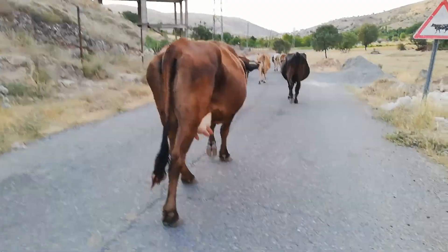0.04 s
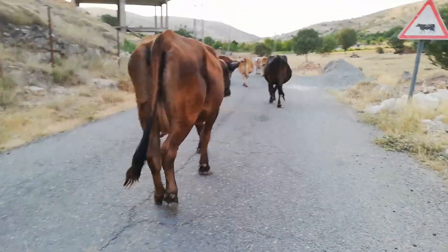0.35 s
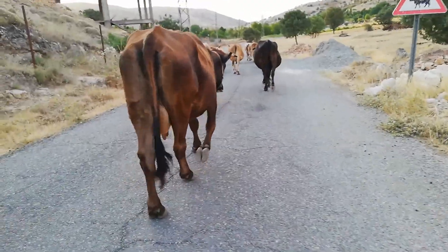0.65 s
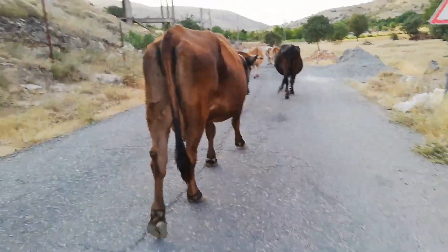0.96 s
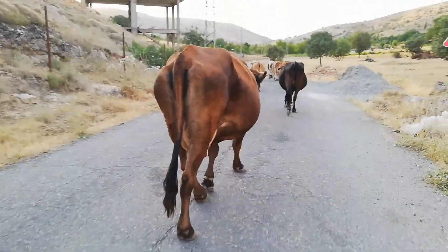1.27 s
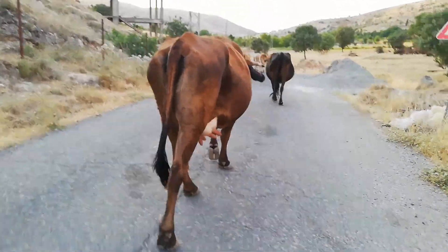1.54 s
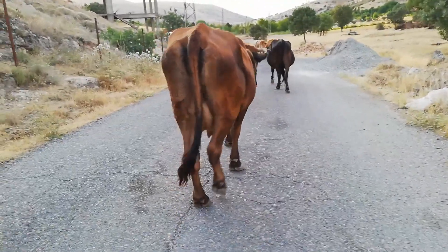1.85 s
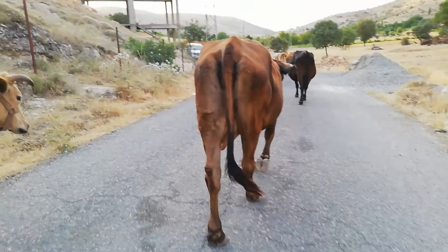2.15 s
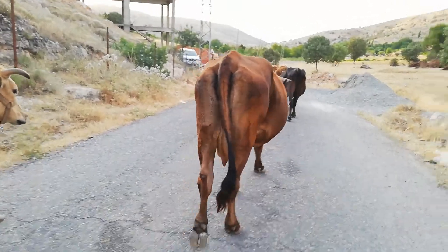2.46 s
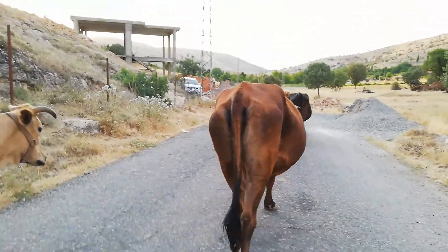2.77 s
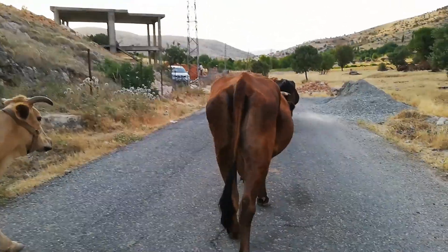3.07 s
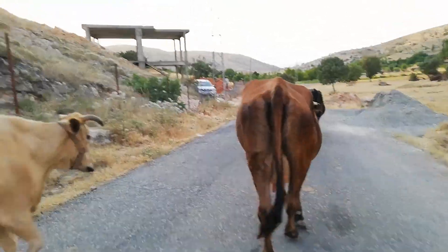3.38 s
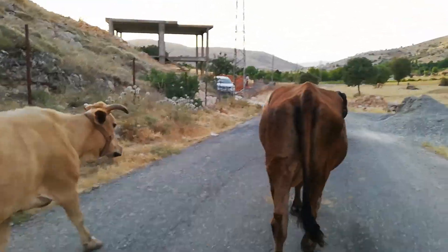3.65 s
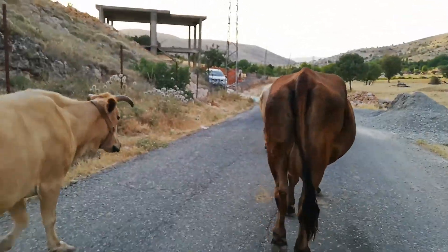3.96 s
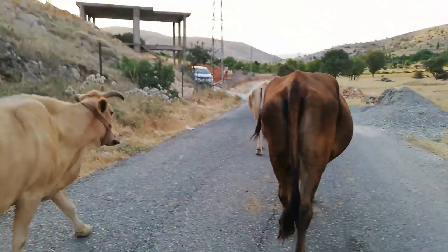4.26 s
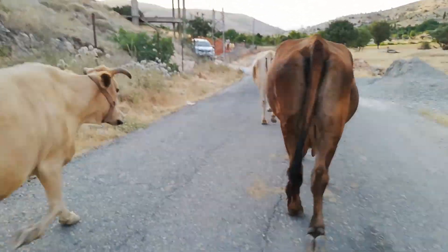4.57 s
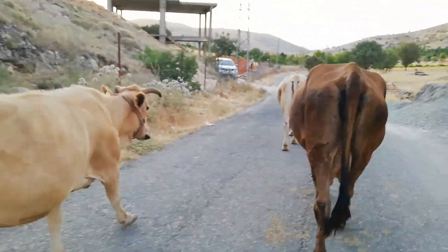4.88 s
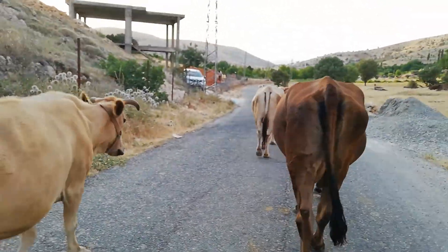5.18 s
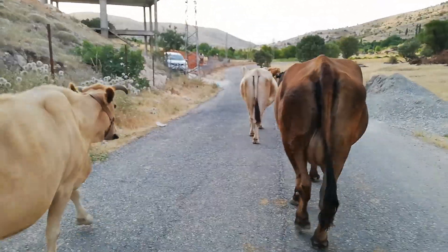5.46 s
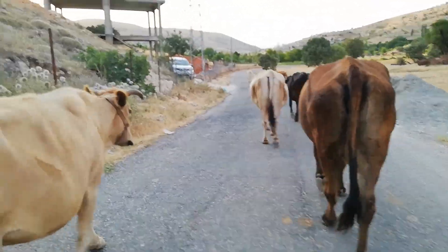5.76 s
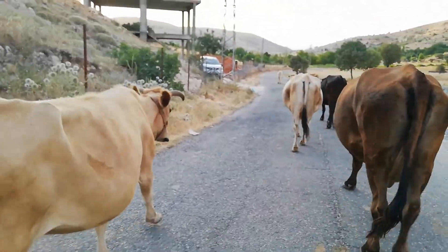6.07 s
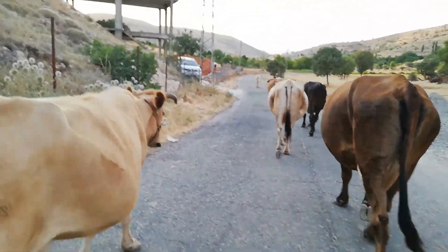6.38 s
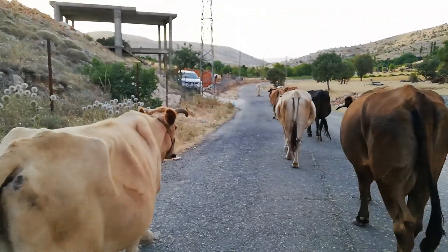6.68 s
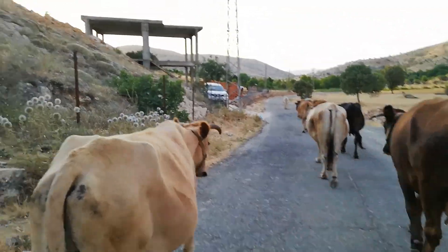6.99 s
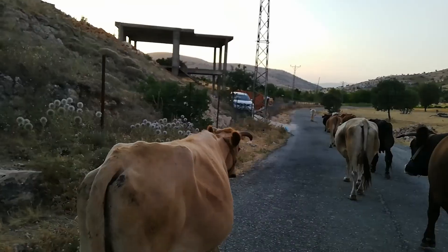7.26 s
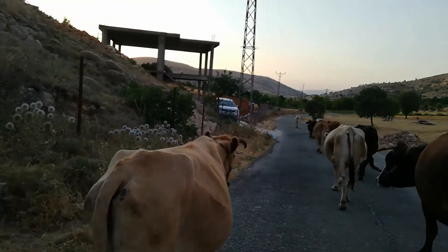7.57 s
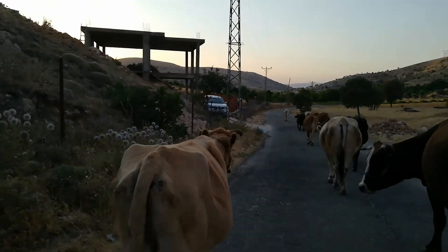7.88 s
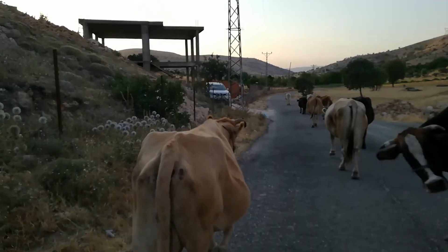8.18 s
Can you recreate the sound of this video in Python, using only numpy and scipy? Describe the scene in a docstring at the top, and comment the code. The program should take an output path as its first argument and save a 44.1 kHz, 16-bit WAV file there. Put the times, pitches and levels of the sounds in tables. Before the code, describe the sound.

Cattle and a herder walk along a gritty asphalt road in quiet open country, heard from a handheld microphone just behind the animals. From the start, shoes crunch on sand and gravel about every 0.6 seconds, among irregular hoof knocks, short scuffs and the sharp snaps of loose stones. A light breeze rumbles on the microphone in soft, uneven gusts. At about 1.4 seconds one hoof lands with a hollow clop inside a quick cluster of knocks. A heavy tread thumps dully near 2.9 seconds. Firmer knocks come around 4, 4.5 and 5.2 seconds, the middle one with a low thud. A stone snaps at 6.1 seconds, the hardest knock follows at 6.4, and another sharp snap comes near 7.3. Faint hooves further up the road and the close crunching steps carry on until the end, just after 8 seconds.

```python
"""A gritty country road, heard from a phone carried by a herder close behind ambling cattle.
From the start a light breeze rumbles on the two microphone ports, which colour the sound very differently.
Hooves and shoes knock on the asphalt, loose stones snap, and grit crunches at each step, 0.6 s apart.
One hoof lands hollow at 1.4 s, a heavy tread thumps near 2.9 s, and the hardest knock comes at 6.4 s.
Faint hooves carry on further up the road to the end."""
import sys
import numpy as np
from scipy import signal
from scipy.fft import rfft, irfft, next_fast_len
from scipy.io import wavfile

SR = 44100
rng = np.random.default_rng(int(sys.argv[2]) if len(sys.argv) > 2 else 0)


def generate_wav(sig):
    """Save sig (samples, or channels by samples) to the path in sys.argv[1] as 16-bit PCM at SR."""
    pcm = np.round(np.clip(np.atleast_2d(sig).T, -1, 1) * 32767).astype(np.int16)
    wavfile.write(sys.argv[1], SR, pcm)


N = 362943
T = np.arange(N) / SR
TAPS = 2048
HZ = np.fft.rfftfreq(TAPS, 1 / SR)
PORT_LAG_S = .00035  # sound from straight below reaches the right port later

# hooves and heels on the asphalt: start_s, knock_db, clack_db, clack_hz, crush_s, pan_db (left over right)
FOOT_KNOCKS = [(.052, -49.5, -50, 1950, 0.0031, 4.5), (0.7728, -53, -49, 1740, .0016, -3),
               (0.9679, -54, -50, 2620, 0.001, -6.5), (1.331, -42, -45.5, 1560, 0.0031, 6),
               (1.3942, -42, -46, 1890, 0.0052, 1), (1.476, -36.5, -39.5, 2510, 0.0036, 4),
               (1.5134, -37.5, -63, 1540, 0.00083, 3.5), (1.8133, -55, -53.5, 1450, 0.0032, -2),
               (2.0893, -40, -34.5, 2570, .0032, 5.5), (2.2161, -47.5, -45, 1520, .0035, -1),
               (2.5084, -46.5, -65, 1640, 0.0026, 1.5), (2.8778, -51, -55, 1540, 0.0053, -3),
               (2.9412, -46, -47.5, 1740, 0.0043, 1.5), (3.2466, -49, -42, 1550, .004, -2),
               (3.5835, -43.5, -46.5, 1740, .0003, -9.5), (3.6537, -58, -38.5, 1530, 0.0036, 5.5),
               (3.9539, -32.5, -36.5, 3130, .0025, 4), (4.3922, -43, -45, 1640, 0.003, 4.5),
               (4.475, -33, -31, 1730, 0.000087, -12), (4.598, -41.5, -50, 1640, .0014, 3.5),
               (5.07, -42.5, -50, 1670, 0.0058, 4.5), (5.1054, -43, -45, 1590, 0.0063, 5.5),
               (5.2131, -37, -39, 3340, 0.004, 2.5), (5.2225, -34, -36.5, 3250, 0.0019, 1.5),
               (5.6021, -51, -52.5, 2440, 0.0047, 1), (5.8187, -47, -49, 2380, .001, 0),
               (5.8696, -55, -45.5, 1800, 0.0052, -1), (6.3988, -34.5, -33.5, 1750, 0.0027, 0),
               (6.4023, -27, -30.5, 2670, .0014, 4), (6.466, -48, -44.5, 2030, .002, -0.5),
               (6.957, -47.5, -66, 2500, .001, 0.5), (7.0282, -41, -51, 1690, 0.0029, -2.5),
               (7.5306, -41, -47, 3300, 0.0043, 2.5), (7.5962, -40, -49, 1800, 0.0033, 2),
               (7.891, -52, -51, 1710, .0067, 0.5), (8.0368, -49, -48, 3000, 0.00044, 8),
               (8.1556, -39, -51, 1850, 0.0028, 5.5)]
# loose stones snapping underfoot: start_s, clack_db, tick_db, clack_hz, crush_s, pan_db
STONE_SNAPS = [(.221, -44.5, -69, 2380, .001, 7.5), (0.2667, -52, -41, 3000, .001, 2.5),
               (0.3054, -58, -45, 3000, .0003, 2.5), (0.6347, -57, -47.5, 1940, .002, 5.5),
               (.825, -48.5, -47, 2620, .003, 4), (1.1564, -42, -69, 2380, 0.00054, 6.5),
               (1.2308, -42, -67, 2290, 0.00055, 4.5), (1.3895, -44, -56, 3640, 0.0027, 0.5),
               (1.869, -42.5, -75, 1980, 0.0016, 3.5), (2.1432, -47.5, -36.5, 1810, 0.0011, 2),
               (2.297, -50.5, -64, 1820, .0016, 7), (2.4103, -40.5, -55, 2420, 0.00072, 8.5),
               (2.4846, -44, -70, 1900, .0013, 3.5), (2.7894, -55, -44, 3230, .002, 2.5),
               (3.338, -46, -39.5, 2780, .0008, -3), (3.371, -57, -45, 2800, .001, 0.5),
               (3.649, -37, -52, 2880, 0.00096, 8.5), (3.725, -38.5, -54, 1730, 0.0067, -2.5),
               (3.9866, -40.5, -67, 3120, .0013, 5), (4.112, -55, -47, 3000, .001, 1),
               (4.166, -39, -66, 4640, 0.0035, 7.5), (4.301, -59, -51, 3500, .0003, 9),
               (4.3441, -41, -65, 2580, 0.002, 0), (4.8556, -48.5, -46, 3940, .0014, 1),
               (4.9359, -47, -46, 4700, .003, 4), (4.973, -41, -47, 2050, 0.0011, 3.5),
               (5.33, -51, -48, 2900, .003, 1.5), (5.5073, -50, -75, 2200, 0.00068, 8.5),
               (6.0861, -49, -68, 2970, 0.0011, 8.5), (6.1076, -30, -38.5, 2830, 0.0017, 7),
               (6.1864, -43, -53.5, 2070, .002, 3.5), (6.3272, -48.5, -47, 3340, 0.0011, -1),
               (6.4294, -31.5, -39, 2330, 0.0015, 3), (6.681, -38, -72, 2550, 0.00061, 5.5),
               (6.7775, -46, -81, 2130, 0.0026, 3.5), (6.877, -51, -68, 3500, .003, -1.5),
               (7.022, -49, -42, 3000, .003, 5), (7.2537, -31.5, -31, 3370, 0.00018, 1.5),
               (7.332, -43.5, -68, 1850, 0.004, -5), (7.64, -60, -44.5, 3000, 0.0024, 0)]


def amp(db):
    """Decibels to gain."""
    return 10 ** (np.asarray(db) / 20)


def unit_rms(x):
    """Scales to an rms of 1."""
    return x / np.sqrt(np.mean(x ** 2) + 1e-20)


def gain_at(spectrum, hz):
    """The gain of a spectrum, with straight lines on a log-frequency axis."""
    corner_hz, db = np.transpose(spectrum)
    return amp(np.interp(np.log(hz + 1), np.log(corner_hz + 1), db))


def add(mix, start_s, sound):
    """Mixes a sound in at start_s."""
    part = mix[..., max(round(start_s * SR), 0):][..., :sound.shape[-1]]
    part += sound[..., :part.shape[-1]]


def causal_ring(gain):
    """The shortest causal ring that has this gain over HZ."""
    log_gain = np.log(np.maximum(gain, gain.max() * 1e-5))
    mirrored = np.r_[log_gain, log_gain[-2:0:-1]]
    return np.fft.ifft(np.exp(np.conj(signal.hilbert(mirrored)))).real


def colour(x, spectrum):
    """Passes a sound through a causal filter."""
    return signal.oaconvolve(x, causal_ring(gain_at(spectrum, HZ)))[:len(x)]


def noise(spectrum):
    """Random noise of a given spectrum."""
    size = next_fast_len(N)
    gain = gain_at(spectrum, np.fft.rfftfreq(size, 1 / SR))
    return unit_rms(irfft(rfft(rng.standard_normal(size)) * gain, size)[:N])


def wander(per_s):
    """A random curve of rms 1 with per_s knots a second."""
    knots = np.arange(0, T[-1] + 1, 1 / per_s)
    return unit_rms(np.interp(T, knots, rng.standard_normal(len(knots))))


def swell(centre_s, half_s):
    """A smooth rise and fall, as power."""
    return np.exp(-((T - centre_s) / half_s) ** 2)


def hump(hz, octaves):
    """A broad resonance over HZ, as power with a mean of 1."""
    power = 1 / (1 + (np.log2((HZ + 1) / hz) / octaves) ** 2) ** 3
    return power / power.mean()


def mode(db, hz, t60_s):
    """One dying sine."""
    t = np.arange(SR // 5) / SR
    return amp(db - 60 * t / t60_s) * np.sin(2 * np.pi * hz * t)


def cracks(per_s, spread_db):
    """A random train of clicks: many small, a few large."""
    size = amp(spread_db * np.minimum(rng.exponential(1, N), 4))
    return size * rng.choice([-1., 1.], N) * (rng.random(N) < per_s / SR)


def ports(x, lag_s, pan_db=0):
    """Shares a sound between the ports; positive lag delays the right, positive pan favours the left."""
    lag = round(lag_s * SR)
    pair = np.array([np.r_[np.zeros(max(late, 0)), x][:len(x)] for late in (-lag, lag)])
    return pair * unit_rms(amp([[pan_db], [0]]))


def roadside(x, wet_db, near_db=-11, near_t60_s=0.023, far_db=-19, far_t60_s=0.13):
    """The road and nearby bodies scatter a sound at once; the bank adds a thin, dull tail."""
    t = np.arange(SR // 4) / SR
    near, far = rng.standard_normal((2, 2, len(t))) * (rng.random((2, 2, len(t))) < 2500 / SR)
    near = near * amp(-60 * t / near_t60_s) * (t > .0006)
    far = far * amp(-60 * t / far_t60_s) * (t > .008)
    far = signal.lfilter(*signal.butter(2, 4000, fs=SR), far)
    echo = sum(amp(db) * taps / np.linalg.norm(taps, axis=1, keepdims=True)
               for db, taps in ((near_db, near), (far_db, far)))
    out = amp(wet_db) * signal.fftconvolve(x, echo, axes=1)
    add(out, 0, x)
    return out


def strike(thud_db, knock_db, clack_db, tick_db, clack_hz, crush_s, pan_db, ring_share=1.0, tick_hz=6600):
    """One contact and a quick run of smaller fractures sound the foot, the road and the stone."""
    t = np.arange(TAPS) / SR
    crush_s = max(crush_s, 1e-4)
    fractures = rng.standard_normal(TAPS) * (rng.random(TAPS) < 5000 / SR)
    force = 0.53 * fractures * np.exp(-t / crush_s)
    force[0] = -1  # the first contact
    # a sudden snap is broad; a longer crush sets hoof horn or stone ringing at its pitch
    ringing = ring_share * crush_s / (crush_s + 0.002)
    clack = ringing * hump(clack_hz, .27) + (1 - ringing) * hump(clack_hz, 1.05)
    power = (amp(thud_db) ** 2 * hump(364, 0.85) + amp(knock_db) ** 2 * hump(1010, 0.61)
             + amp(clack_db) ** 2 * clack + amp(tick_db) ** 2 * hump(tick_hz, 0.94))
    blow = signal.fftconvolve(force, causal_ring(np.sqrt(power)))
    energy = power.mean() * .01 * SR  # that power held for 10 ms
    blow *= np.sqrt(energy / np.sum(blow ** 2))
    lag_s = .0003 + .00005 * pan_db  # the further left, the later at the right port
    level_db = 10 * np.log10(power.mean())
    # loud strikes are close and dry, faint ones far and scattered
    return roadside(ports(blow, lag_s, pan_db), wet_db=-.55 * (level_db + 44))


def valley_air(level_db=-63):
    """The steady quiet of the open valley, partly shared by the ports."""
    # spectrum of the open air: frequency_hz, density_db
    air_spectrum = [(30, 11.5), (300, 3.5), (650, -11), (1200, -5.5), (3000, -14.5), (6000, -7),
                    (16000, -21.5)]
    shared = noise(air_spectrum)
    apart = np.array([noise(air_spectrum), noise(air_spectrum)])
    return amp(level_db) * unit_rms(shared + 0.71 * apart)


def breeze(calm_db=-61.5, lumpy_db=3.0, apart_db=-14):
    """Lumpy low buffeting right on the microphone, mostly shared by the ports."""
    # spectrum of the buffeting: frequency_hz, density_db
    wind_spectrum = [(2, -16), (14, 1.5), (35, -0.5), (70, -2.5), (130, -7.5), (300, -15), (600, -38),
                     (2000, -42)]
    # gusts on the microphone: centre_s, half_length_s, level_db
    gusts = [(0.252, 0.13, -52), (0.846, 0.1, -55), (1.527, 0.048, -55), (2.603, 0.097, -59.5),
             (2.915, 0.2, -54), (3.66, 0.11, -52.5), (4.14, 0.076, -49.5), (4.454, 0.06, -54),
             (5.856, 0.088, -56), (6.255, 0.03, -51.5), (6.486, 0.033, -52.5), (7.137, 0.22, -54),
             (7.534, 0.033, -51.5), (7.716, 0.043, -52), (8.1, .03, -49.5)]
    shared = noise(wind_spectrum)
    apart = np.array([noise(wind_spectrum), noise(wind_spectrum)])
    buffet = unit_rms((shared + amp(apart_db) * apart) * amp(lumpy_db * wander(per_s=25)))
    gust_power = sum(amp(db) ** 2 * swell(centre_s, half_s) for centre_s, half_s, db in gusts)
    return np.sqrt(amp(calm_db) ** 2 + gust_power) * buffet


def far_herd(clack_db=-58, knock_db=-61, spread_db=3, count=50):
    """Faint hooves of the cattle further up the road."""
    out = np.zeros((2, N))
    for k, (when, size, pitch, side) in enumerate(rng.uniform(-1.2, 1, (count, 4))):
        knock, clack = knock_db + spread_db * size, clack_db + spread_db * size
        hoof = strike(knock - 6.5, knock, clack, clack - 19.5,
                      clack_hz=2000 * 1.5 ** pitch, crush_s=0.0017, pan_db=5 * side)
        add(out, (k + .5 + when / 2) * T[-1] / count, hoof)
    return out


def tread(start_s, length_s, press_s=0.054, load_db=3, lift_db_per_s=260):
    """A foot presses on the grit, grows louder as it takes the weight, and lifts; as power."""
    t = T - start_s
    press = np.clip(t / press_s + 1, 0, 1)
    weight_db = load_db * (np.clip(t / length_s, 0, 1) - .5)
    lift_db = lift_db_per_s * np.maximum(t - length_s, 0)
    return (press * amp(weight_db - lift_db)) ** 2


def grinding(shuffle_sand_db=-66.5, shuffle_gravel_db=-62, scatter_db=-15.5, scatter_db_per_s=220):
    """How hard steps, scuffs and blows work the sand and the gravel: a gain curve for each."""
    # the herder's soles crunch down, then the toe pushes off:
    # start_s, length_s, sand_db, gravel_db, push_after_s, push_db (against the crunch)
    steps = [(0.247, 0.1, -48, -50, 0.33, -5.5), (0.72, 0.12, -47, -51.5, 0.23, 0.5),
             (1.474, 0.13, -52.5, -54, 0.25, -5.5), (2.038, 0.11, -51, -48.5, 0.22, -12),
             (2.758, 0.033, -57, -49, 0.14, -7), (3.279, 0.092, -49, -50, 0.181, 0),
             (3.964, 0.13, -47.5, -48.5, 0.22, -10.5), (4.553, 0.18, -50.5, -53, 0.32, -4.5),
             (5.228, 0.1, -47, -48, 0.17, -6.5), (5.756, 0.102, -49, -47, 0.21, -11),
             (6.407, 0.16, -52, -51.5, 0.165, -4.5), (6.938, 0.12, -50, -49.2, 0.27, -3),
             (7.628, 0.023, -48.5, -48.5, 0.28, -5), (8.202, 0.1, -47.6, -50, 0.2, -6.0)]
    # hooves dragging over the grit: start_s, length_s, sand_db, gravel_db
    scuffs = [(0, 0.1, -49.5, -53), (0.364, 0.021, -49.5, -61), (1.065, 0.092, -52.5, -55.5),
              (1.91, 0.077, -56.5, -58.5), (3.12, .02, -76, -57), (3.572, 0.064, -66, -56.5),
              (4.352, .025, -62, -48.5), (4.445, 0.021, -55.5, -48.5), (6.078, 0.015, -55, -57)]
    # the rest of the herd never stops shuffling, in fits and starts
    power = amp([[shuffle_sand_db], [shuffle_gravel_db]]) ** 2 * amp(2 * wander(per_s=16)) ** 2
    for start_s, length_s, sand_db, gravel_db, push_after_s, push_db in steps:
        push_off = amp(push_db) ** 2 * swell(start_s + push_after_s, half_s=0.059)
        power += amp([[sand_db], [gravel_db]]) ** 2 * (tread(start_s, length_s) + push_off)
    for start_s, length_s, sand_db, gravel_db in scuffs:
        power += amp([[sand_db], [gravel_db]]) ** 2 * tread(start_s, length_s)
    # gravel chips scatter after each blow, in proportion to its clack
    scatter = amp(scatter_db - scatter_db_per_s * T[:SR // 2]) ** 2
    blows = [(row[0], row[2]) for row in FOOT_KNOCKS] + [row[:2] for row in STONE_SNAPS]
    for start_s, clack_db in blows:
        add(power[1], start_s, amp(clack_db) ** 2 * scatter)
    return np.sqrt(power)


def sand(pressure, clump_db=4.0, ping_db=-6, ping_t60_s=0.0042):
    """Fine grains burst in clumps as soles roll over them; single hard ones ping at their own pitch."""
    # spectrum of bursting grains: frequency_hz, density_db
    grain_spectrum = [(300, -67), (1500, -3), (4000, -5.5), (7000, -3), (10000, 0.5), (16000, -1)]
    clumps = amp(clump_db * wander(per_s=180))
    crackle, pings = np.zeros((2, N)), np.zeros((2, N))
    for lag_s in np.linspace(-PORT_LAG_S, 2 * PORT_LAG_S, 3):
        crackle += ports(colour(cracks(per_s=1500, spread_db=4.0) * clumps, grain_spectrum), lag_s)
    for hz in np.geomspace(3600, 13000, 12):
        ping = signal.oaconvolve(cracks(per_s=7, spread_db=6), mode(0, hz, ping_t60_s))[:N]
        pings += ports(ping, PORT_LAG_S * rng.uniform(-1, 4.05))
    # pings go on between the strides, so they follow the pressure only partly
    ping_gain = amp(ping_db) * np.sqrt(pressure * pressure.mean())
    return pressure * unit_rms(crackle) + ping_gain * unit_rms(pings)


def gravel(pressure, gain_db=-1.0, clump_db=4.0, patch_db=3.0, ring_cycles=1.84):
    """Chips of many sizes grind together; each rings for a few cycles from its own place on the road."""
    # colour of the scraping chips: frequency_hz, gain_db
    scrape_spectrum = [(100, -7.5), (300, -2.5), (650, -1), (1200, 3), (2000, -0.5), (3200, -1), (5000, -6),
                       (9000, -5.5), (16000, -39)]
    out, t = np.zeros((2, N)), np.arange(TAPS // 2) / SR
    clumps = amp(clump_db * wander(per_s=90))
    for hz in np.geomspace(300, 5500, 20):
        ring = np.exp(-t * hz / ring_cycles) * np.sin(2 * np.pi * hz * t)
        caught = amp(patch_db * wander(per_s=35))  # which size of chip is under the sole keeps changing
        chips = signal.oaconvolve(cracks(per_s=300, spread_db=4) * clumps * caught, ring)[:N]
        lag_s = PORT_LAG_S * rng.uniform(0.44, 2.2)
        out += ports(unit_rms(chips) * np.sqrt(hz), lag_s, pan_db=rng.normal(-0.65, 2.4))
    scrape = np.array([colour(side, scrape_spectrum) for side in out])
    return amp(gain_db) * pressure * unit_rms(scrape)


def heavy_treads(gain_db=-2):
    """Weight lands on the road with a dull thump."""
    # low thumps: start_s, level_db, pitch_hz, t60_s
    thumps = [(1.514, -42.5, 213, 0.077), (2.879, -30.5, 188, 0.042), (2.905, -39, 60, 0.09),
              (2.945, -36, 93, 0.065), (3.64, -40, 85, 0.11), (4.078, -44.5, 283, 0.097),
              (4.144, -44, 277, 0.14), (4.472, -31, 110, .05), (7.525, -37.5, 176, 0.06),
              (8.081, -42, 129, 0.061)]
    out = np.zeros((2, N))
    for start_s, *ring in thumps:
        add(out, start_s, ports(mode(*ring), PORT_LAG_S, pan_db=-2.2))
    return amp(gain_db) * out


def hollow_clop(start_s=1.397, gain_db=2):
    """One hoof lands hollow and rings briefly."""
    # modes of the hoof: level_db, pitch_hz, t60_s
    hoof_modes = [(-42, 385, .075), (-51, 1170, .025), (-50, 1330, .025)]
    out = np.zeros((2, N))
    add(out, start_s, ports(sum(mode(*ring) for ring in hoof_modes), PORT_LAG_S))
    return amp(gain_db) * out


def stone_snaps(gain_db=0.5):
    """Loose stones snap underfoot; they barely move the road, so thud and knock stay weak."""
    out = np.zeros((2, N))
    for start_s, clack_db, tick_db, *contact in STONE_SNAPS:
        thud_db, knock_db = clack_db - 27.5, clack_db - 20.5
        tick_hz = 7700 * 2 ** (0.01 * (clack_db - tick_db))  # a tick weak against its clack sits higher
        snap = strike(thud_db, knock_db, clack_db, tick_db, *contact, ring_share=0.81, tick_hz=tick_hz)
        add(out, start_s, snap)
    return amp(gain_db) * out


def foot_knocks(gain_db=0.5):
    """Hooves and heels hit the asphalt close to the microphone."""
    out = np.zeros((2, N))
    for start_s, knock_db, clack_db, *contact in FOOT_KNOCKS:
        thud_db, tick_db = knock_db - 10.5, clack_db - 13
        add(out, start_s, strike(thud_db, knock_db, clack_db, tick_db, *contact))
    return amp(gain_db) * out


def scene():
    """Feet, grit and breeze on the open road, from the herder's place behind the cattle."""
    on_sand, on_gravel = grinding()
    near_feet = foot_knocks() + stone_snaps() + heavy_treads() + hollow_clop()
    return near_feet + far_herd() + sand(on_sand) + gravel(on_gravel) + breeze() + valley_air()


def record(dry, hiss_db=-76, edge_hz=15800):
    """Each port of the phone adds its own resonances; then faint hiss and the band limit."""
    # the bright left microphone port: frequency_hz, gain_db
    left_port = [(100, 0), (600, 0), (1000, 4), (1350, 0), (3000, 0), (5200, -1), (7500, 1), (9000, 8),
                 (10300, 12), (12000, 2), (15500, -6)]
    # the right port, strong in the middle and dull on top: frequency_hz, gain_db
    right_port = [(100, 0), (500, 3), (750, -3), (1050, 2), (1300, 2), (1900, 6), (2800, 7), (3600, 5),
                  (4500, -1), (5500, -7), (10000, -16), (15500, -19)]
    heard = np.array([colour(dry[0], left_port), colour(dry[1], right_port)])
    heard += amp(hiss_db) * rng.standard_normal((2, N))
    band_limit = signal.firwin(511, edge_hz, window=("kaiser", 9), fs=SR)
    return signal.oaconvolve(heard, band_limit[None], "same")


dry = scene()
out = record(dry)
generate_wav(out)
```